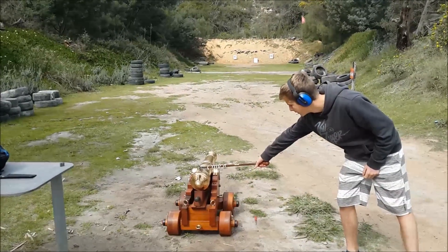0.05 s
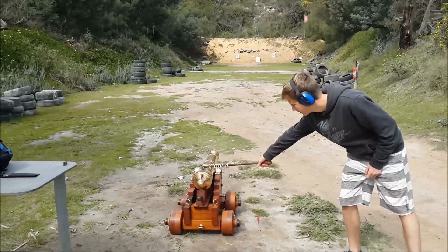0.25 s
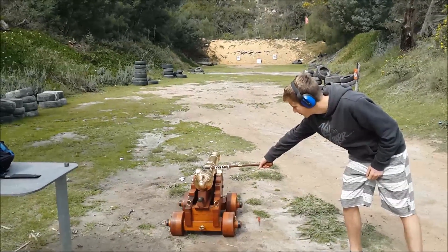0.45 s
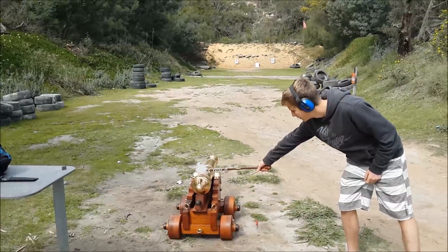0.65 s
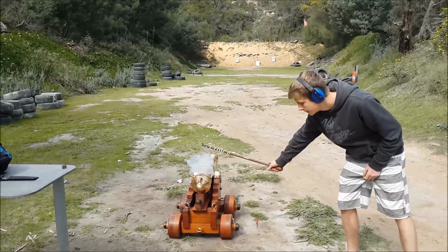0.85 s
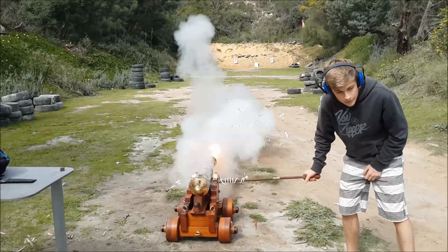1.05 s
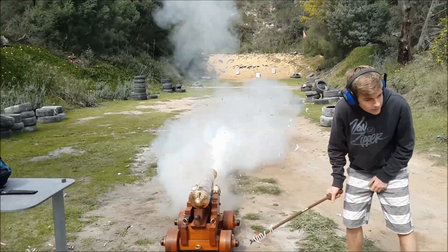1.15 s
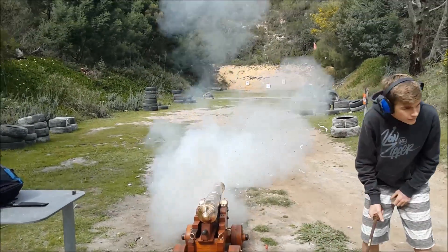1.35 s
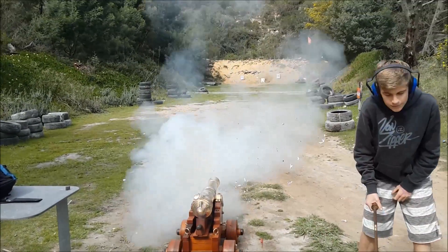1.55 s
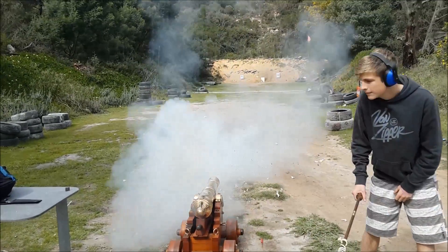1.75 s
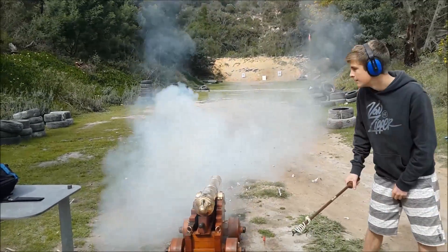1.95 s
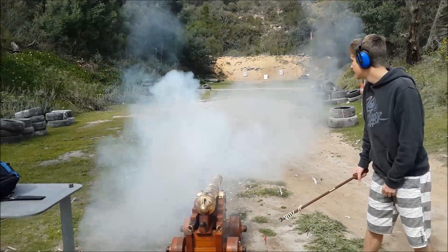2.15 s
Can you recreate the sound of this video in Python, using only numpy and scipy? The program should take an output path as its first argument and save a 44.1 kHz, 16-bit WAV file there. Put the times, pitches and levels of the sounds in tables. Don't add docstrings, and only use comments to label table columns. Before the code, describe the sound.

A small black-powder cannon fizzes briefly, then fires one sharp, overloading blast that echoes outdoors.

```python
import sys
import numpy as np
from scipy import signal
from scipy.fft import rfft, irfft, next_fast_len
from scipy.io import wavfile
from scipy.ndimage import uniform_filter1d, map_coordinates

SR = 44100
rng = np.random.default_rng(int(sys.argv[2]) if len(sys.argv) > 2 else 0)


def boost_factor(decibels):
    exponent = np.asarray(decibels, float) / 20
    return 10 ** exponent


def generate_wav(signal):
    frames = np.transpose(np.atleast_2d(signal))
    scaled = np.clip(frames, -1, 1) * 32767
    pcm = np.round(scaled).astype(np.int16)
    wavfile.write(sys.argv[1], SR, pcm)


N = 96182

# (time [s], level [dB])
SCATTER = [(1.245, -2), (1.3, -6.5), (1.385, -18), (1.49, -21.5), (1.53, -25), (1.68, -30), (1.83, -32),
           (1.96, -40), (2.18, -59)]
# (frequency [Hz], level [dB])
SCATTER_COLOUR = [(80, -26), (300, -6), (1300, -0.5), (2900, -5.5), (5000, -2.5), (8000, -8), (13000, -9.5),
                  (16000, -12.5)]
# (frequency [Hz], loss [dB/s])
AIR_LOSS = [(300, -6.5), (2000, 0.5), (5000, 9.5), (8000, 14.5), (12000, 46), (16000, 72.5)]
# (time [s], level [dB])
FIZZ = [
    (.66, -85),
    (.715, -61),
    (.77, -56),
    (.85, -58.5),
    (.97, -57.5),
    (1.05, -59.5),
    (1.17, -61),
    (1.25, -61),
    (1.3, -100),
]
# (frequency [Hz], level [dB])
FIZZ_COLOUR = [(200, -19.5), (900, -9), (1700, 5), (3000, -9), (4600, -2), (8000, -6.5), (13000, -9.5),
               (16000, -13)]
# (frequency [Hz], level [dB])
JET_COLOUR = [(150, -25), (600, -13), (1800, -6), (3000, -7), (4300, -1), (6500, -1), (10000, -6),
              (16000, -12.5)]
# (time [s], thud level [dB], smear [s])
BANKS = [(1.275, -15.5, 0.016), (1.329, -13.5, 0.033), (1.358, -16.5, .025), (1.441, -24.5, 0.045),
         (1.485, -25.5, 0.031), (1.545, -27, 0.046), (1.576, -29.5, 0.02), (1.64, -26.5, 0.061),
         (1.73, -35, .06), (1.805, -35, .07), (1.87, -36.5, 0.08), (1.94, -41.5, 0.053)]
# (frequency [Hz], level [dB])
BANK_COLOUR = [(60, -40.5), (130, -5), (210, -7.5), (300, -6.5), (450, 4.5), (650, -5.5), (1300, -9),
               (3000, -31.5)]
# (frequency [Hz], level [dB])
BOOM = [(122, -11), (184, -12), (268, -15), (316, -15), (560, -17)]
# (time [s], level [dB])
ROLL = [(1.25, -28.5), (1.3, -22), (1.338, -17), (1.4, -22), (1.5, -29.5), (1.6, -29), (1.84, -34),
        (2.07, -53), (2.18, -58.5)]
# (frequency [Hz], level [dB])
ROLL_COLOUR = [(35, -36), (65, -17.5), (105, 0), (190, -2), (300, -11), (600, -16.5), (1500, -27.5),
               (4000, -49.5)]
# (time [s], peak level [dB], frequency [Hz])
TICKS = [
    (1.8304, -29.5, 5590),
    (1.839, -33, 6210),
    (2.0464, -53.5, 5680),
]
# (time [s], peak level [dB], frequency [Hz])
PUFFS = [(0.119, -46, 90), (.36, -46, 151), (.615, -46, 80), (.683, -42.5, 130), (.763, -43, 150),
         (.941, -43, 110), (.955, -42, 120), (.988, -37.5, 119)]
# (frequency [Hz], rms level [dB])
DRONE = [(66, -64.5), (110, -72), (222, -73.5), (443, -66)]
# (time [s], level [dB])
DRONE_SWELL = [(0, -6), (.14, 2), (.25, -12.5), (.5, -14.5), (.66, 4), (.85, 4), (.97, -6), (1.13, 3),
               (2.18, -0.5)]
# (frequency [Hz], level [dB per Hz])
AMBIENCE = [(20, -22.5), (65, -2), (150, -8), (400, -10.5), (900, -14.5), (1900, -15.5), (3200, -26),
            (15000, -34)]
# (frequency [Hz], likeness [-1 to 1])
ALIKE_NEAR = [(60, 0.51), (290, .75), (640, 0.6), (1400, 0.02), (15000, 0)]
# (frequency [Hz], likeness [-1 to 1])
ALIKE_FAR = [(60, .85), (290, .75), (640, .55), (1400, -.25), (15000, -0.05)]
# (frequency [Hz], width [Hz], lift [dB], gain [dB])
PORTS = [
    (5860, 1100, 7, 0.5),
    (7800, 1080, 6.5, 0.5),
]
# (time [s], highest frequency kept [Hz])
TREBLE_LIMIT = [(0, 14400), (1.2, 14300), (1.24, 14650), (1.37, 14200), (1.42, 12800), (1.6, 11330),
                (1.68, 10400), (1.95, 10020), (2.18, 8500)]

TIME = np.arange(N) / SR
FIRE_S = 1.2446


def unit(x):
    return x / np.sqrt(np.mean(x ** 2) + 1e-20)


def along(points, hz):
    f, v = np.transpose(points)
    return np.interp(np.log(hz + 1), np.log(f + 1), v)


def curve(rows):
    return np.interp(TIME, *np.transpose(rows), left=-120)


def wobble(rate):
    points = rng.standard_normal(int(N * rate / SR) + 4)
    return map_coordinates(points, [np.arange(N) * rate / SR])


def filtered(x, response):
    m = next_fast_len(N + SR // 2)
    return irfft(rfft(x, m) * response(np.fft.rfftfreq(m, 1 / SR)), m)[..., :N]


def rush(spectrum, alike, patchy_db, spiky_db=0):
    grain = rng.standard_normal((2, N)) * boost_factor(spiky_db * wobble(900))
    z = signal.stft(grain, nperseg=256)[2]
    patches = uniform_filter1d(rng.standard_normal(z.shape[1:]), 4, 0)
    patches = unit(uniform_filter1d(patches, 8, 1))
    pair = signal.istft(z * boost_factor(patchy_db * patches), nperseg=256)[1][:, :N]

    def response(hz):
        angle = np.arccos(np.clip(along(alike, hz), -1, 1)) / 2
        return boost_factor(along(spectrum, hz)) * [np.cos(angle), np.sin(angle)]

    mid, side = filtered(pair, response)
    return unit(np.array([mid + side, mid - side]))


def scatter():
    wash = rush(SCATTER_COLOUR, ALIKE_NEAR, patchy_db=1.3, spiky_db=0.5)
    hz, s, z = signal.stft(wash, SR, nperseg=256)
    late = np.maximum(s - FIRE_S, 0)
    lean_db = 4 * np.minimum(late / 0.3, 1)
    z[0] *= boost_factor(lean_db / (1 + ((hz[:, None] - 5900) / 900) ** 2))
    z = z * boost_factor(-along(AIR_LOSS, hz)[:, None] * late)
    dulled = signal.istft(z, SR, nperseg=256)[1][:, :N]
    return dulled * boost_factor(curve(SCATTER) + 0.7 * wobble(40.01))


def shot():
    FRONT_DB, FRONT_S = -10.5, 0.0015
    PUSH_DB, PUSH_S = -24.5, 0.012
    since = np.maximum(TIME - FIRE_S, 0)
    u, v = since / FRONT_S, since / PUSH_S
    front = -boost_factor(FRONT_DB) * (1 - u) * np.exp(-u) * (TIME >= FIRE_S)
    push = boost_factor(PUSH_DB) * np.array([[1], [0.3]]) * v * np.exp(1 - v)
    return front + push + scatter()


def priming():
    JET_DB, JET_RISE_DB_PER_S, JET_FALL_DB_PER_S = -17.5, 850.5, 300
    JET_FULL_S, JET_END_S = 1.2322, 1.245
    fizz = rush(FIZZ_COLOUR, ALIKE_NEAR, patchy_db=1.0)
    fizz = fizz * boost_factor(curve(FIZZ) + 0.6 * wobble(25))
    jet_db = JET_DB - JET_RISE_DB_PER_S * np.maximum(JET_FULL_S - TIME, 0)
    jet_db = jet_db - JET_FALL_DB_PER_S * np.maximum(TIME - JET_END_S, 0)
    return fizz + boost_factor(jet_db) * rush(JET_COLOUR, ALIKE_NEAR, patchy_db=5.0)


def banks():
    power = 0
    for start, db, smear in BANKS:
        rise_s = smear / 3
        u = np.maximum(TIME - start + rise_s, 0) / rise_s
        power = power + (boost_factor(db) * u * np.exp(1 - u)) ** 2
    return np.sqrt(power) * rush(BANK_COLOUR, ALIKE_FAR, patchy_db=2.2, spiky_db=2.2)


def boom():
    PEAK_S, RISE_S, T60_S = 1.34, 0.024, 0.19
    t = TIME - PEAK_S
    shape = np.where(t < 0, np.exp(-(t / RISE_S) ** 2), boost_factor(-60 * np.abs(t) / T60_S))
    ring = 0
    for hz, db in BOOM:
        phase = rng.uniform(0, 6) + rng.normal(0, 0.6, (2, 1))
        ring = ring + boost_factor(db + 1.5 * wobble(30)) * np.sin(2 * np.pi * hz * t + phase)
    return shape * ring


def roll():
    return boost_factor(curve(ROLL)) * rush(ROLL_COLOUR, ALIKE_FAR, patchy_db=0.8, spiky_db=1.2)


def ticks():
    T60_S, TICK_DB, WIDTH_HZ = 0.012, -5, 1300
    total = 0
    for start, db, pitch in TICKS:
        noise = filtered(rng.standard_normal(N), lambda hz: np.exp(-((hz - pitch) / WIDTH_HZ) ** 2))
        fade_db = -60 * np.abs(TIME - start - 0.001) / T60_S
        total = total + boost_factor(db + TICK_DB + fade_db) * unit(noise)
    return total


def ping():
    PING_S, PING_DB, LENGTH_S = 1.545, -31, 0.006
    PING_HZ, FALL_HZ_PER_S = 2550, 40000
    t = TIME - PING_S
    cycles = PING_HZ * t - FALL_HZ_PER_S * t ** 2 / 2
    return boost_factor(PING_DB) * np.exp(-(t / LENGTH_S) ** 2) * np.sin(2 * np.pi * cycles)


def drone():
    total = 0
    for hz, db in DRONE:
        strength = boost_factor(db + 6.5 + 2.2 * wobble(23))
        drifting_s = np.cumsum(1 + 0.0044 * wobble(25)) / SR
        total = total + strength * np.sin(2 * np.pi * hz * drifting_s)
    return total * boost_factor(curve(DRONE_SWELL))


def puffs():
    PUFF_S = 0.0041
    total = 0
    for middle, db, hz in PUFFS:
        t = TIME - middle
        pulse = np.exp(-(t / PUFF_S) ** 2) * np.cos(2 * np.pi * hz * t)
        total = total + boost_factor(db + rng.normal(0, 1.9, (2, 1))) * pulse
    return total


def background():
    AIR_DB, HISS_DB, HISS_HZ, HISS_WIDTH_HZ = -55, -70, 7400, 2200
    DUCK_AT_S, DUCK_DB, HISS_DUCK_DB = 1.5, -4.5, -7
    ducked = TIME > DUCK_AT_S
    air = boost_factor(AIR_DB + 1.6 * wobble(4.4)) * rush(AMBIENCE, ALIKE_NEAR, patchy_db=1.5)
    noise = rng.standard_normal((2, N))
    hiss = unit(filtered(noise, lambda hz: np.exp(-((hz - HISS_HZ) / HISS_WIDTH_HZ) ** 2)))
    hiss = hiss * boost_factor(HISS_DB + HISS_DUCK_DB * ducked)
    return (air + hiss + drone() + puffs()) * boost_factor(DUCK_DB * ducked)


def scene():
    return shot() + priming() + banks() + boom() + roll() + ticks() + ping() + background()


def ports(hz):
    RIGHT_TREBLE_DB, TREBLE_HZ = 2.2, 9000
    gains = [boost_factor(gain + lift / (1 + ((hz - centre) / width) ** 2)) for centre, width, lift, gain in PORTS]
    right_db = RIGHT_TREBLE_DB / (1 + (TREBLE_HZ / (hz + 1)) ** 4)
    return np.array(gains) * boost_factor([0 * hz, right_db])


def lose_treble(x):
    JITTER_HZ, STRAY_SHARE, STRAY_REACH_HZ = 249.7, 0.035, 1400
    hz, s, z = signal.stft(x, SR, window="cosine", nperseg=2048, noverlap=1024)
    hz = hz[:, None]
    limit_hz = np.interp(s, *np.transpose(TREBLE_LIMIT))
    limit_hz = limit_hz + JITTER_HZ * rng.standard_normal((2, 1, len(s)))
    stray = rng.random((2, 65, len(s))) < STRAY_SHARE
    stray = np.repeat(stray, 16, axis=1)[:, :len(hz)]
    stray = stray & (hz < np.minimum(limit_hz + STRAY_REACH_HZ, TREBLE_LIMIT[0][1]))
    z = z * ((hz < limit_hz) | stray)
    return signal.istft(z, SR, window="cosine", nperseg=2048, noverlap=1024)[1][:, :N]


def band_limit(x):
    return signal.sosfilt(signal.butter(12, 15390, fs=SR, output="sos"), x)


def record(dry):
    CEILING = 1.1
    clipped = np.clip(filtered(dry, ports), -CEILING, CEILING)
    mix = lose_treble(clipped)
    return band_limit(mix)


dry = scene()
out = record(dry)
generate_wav(out)
```